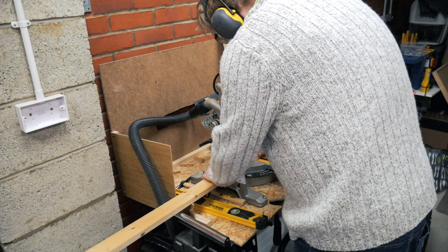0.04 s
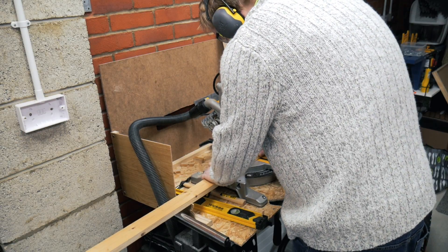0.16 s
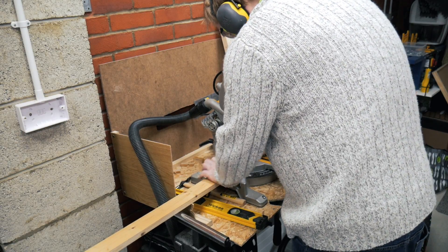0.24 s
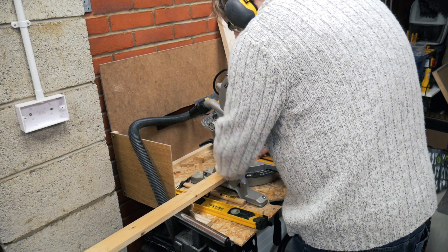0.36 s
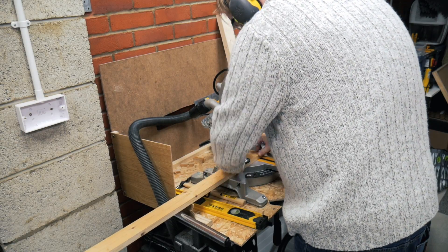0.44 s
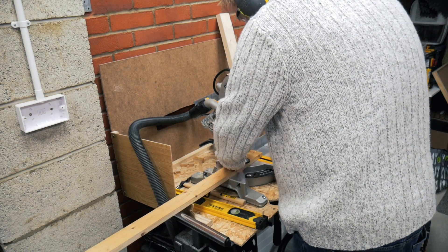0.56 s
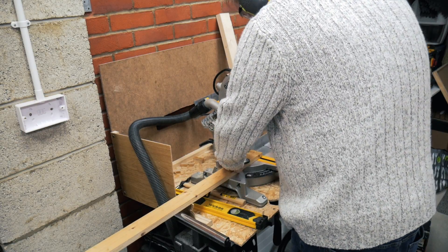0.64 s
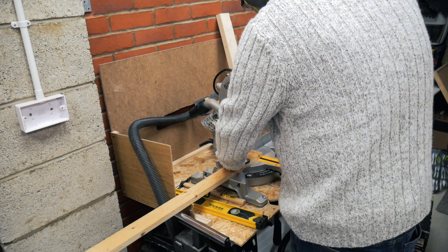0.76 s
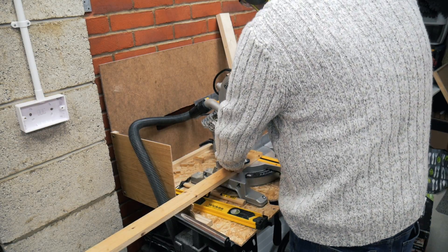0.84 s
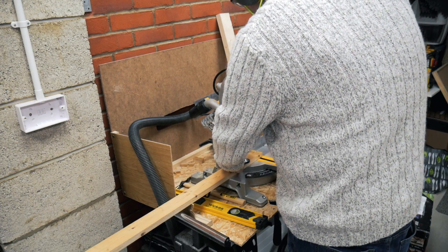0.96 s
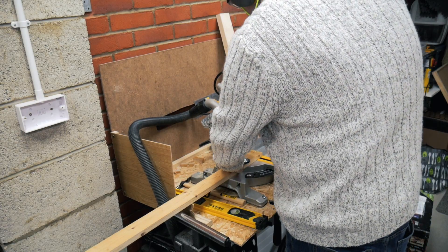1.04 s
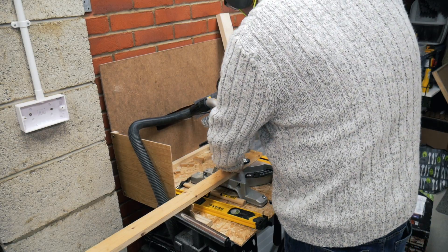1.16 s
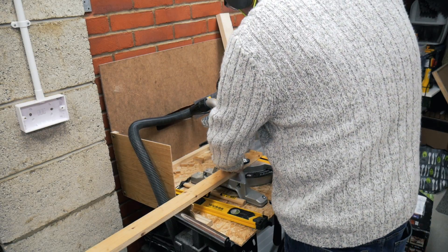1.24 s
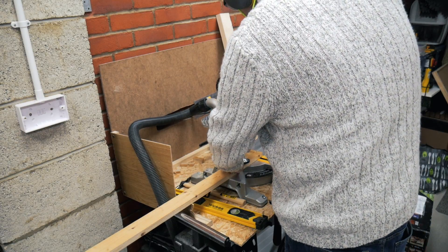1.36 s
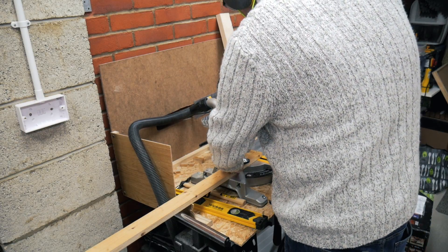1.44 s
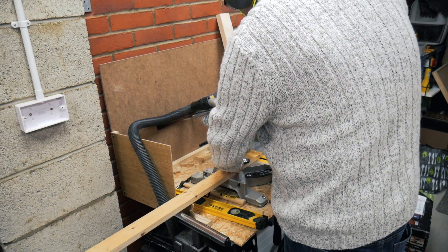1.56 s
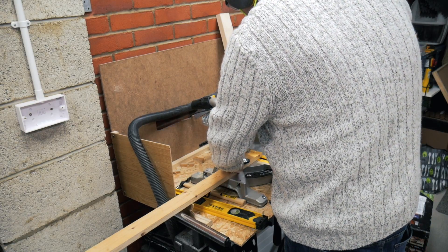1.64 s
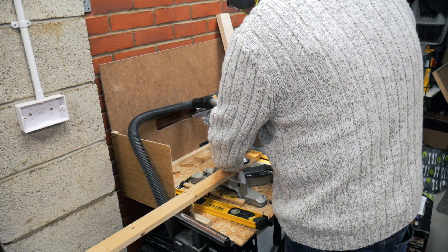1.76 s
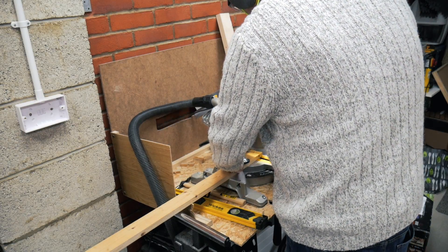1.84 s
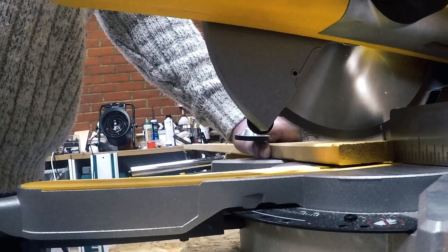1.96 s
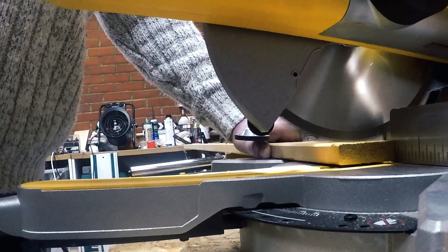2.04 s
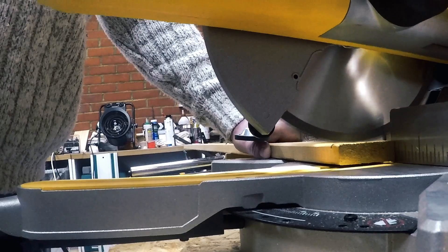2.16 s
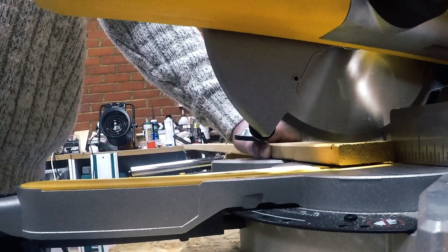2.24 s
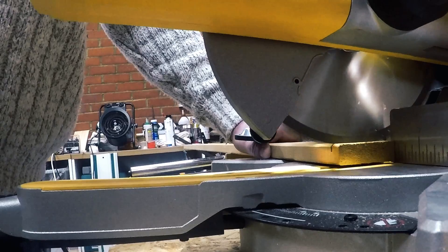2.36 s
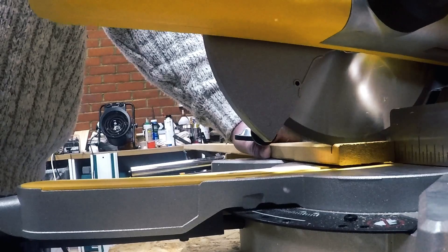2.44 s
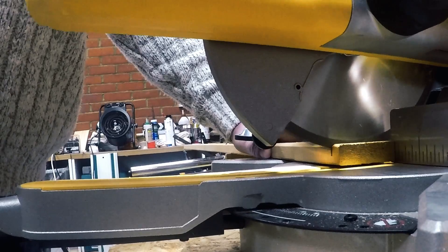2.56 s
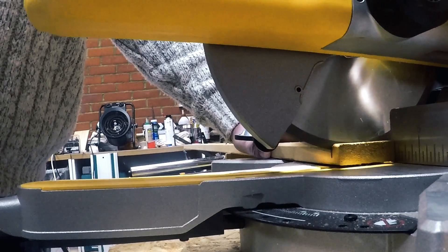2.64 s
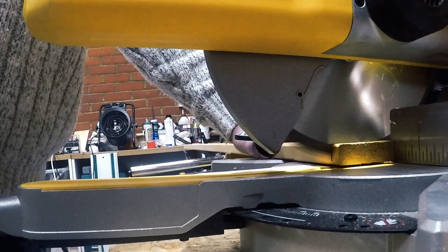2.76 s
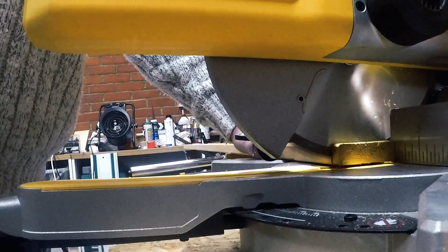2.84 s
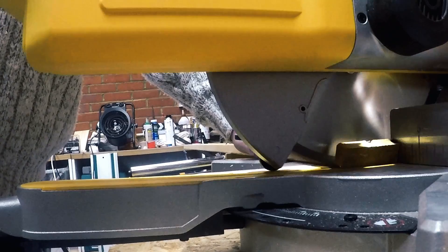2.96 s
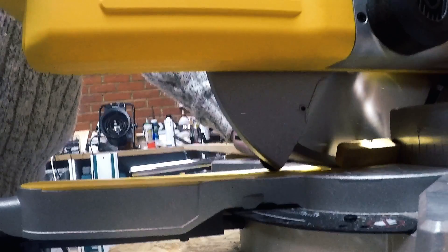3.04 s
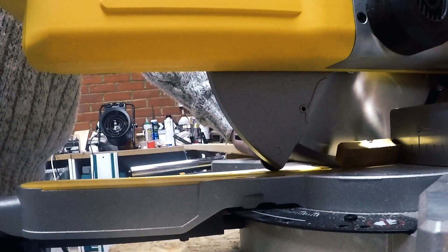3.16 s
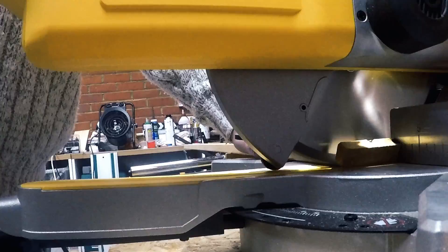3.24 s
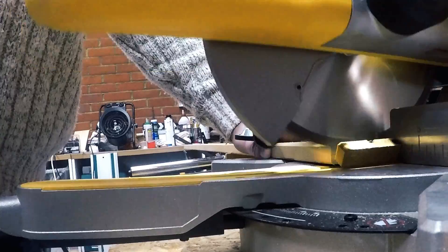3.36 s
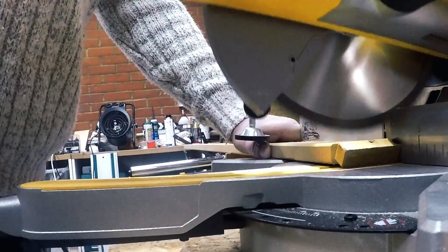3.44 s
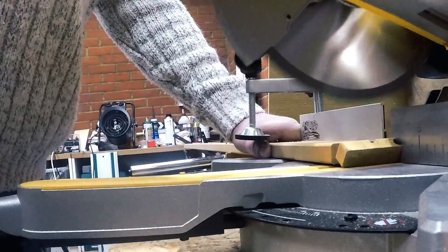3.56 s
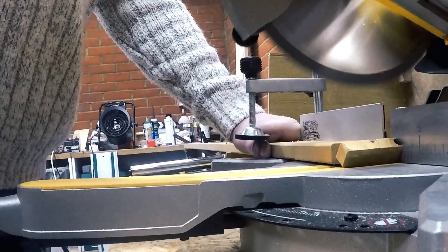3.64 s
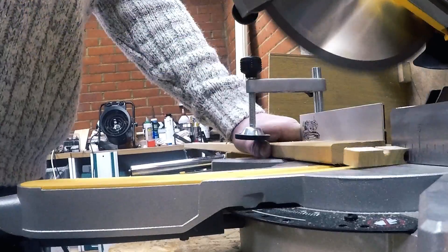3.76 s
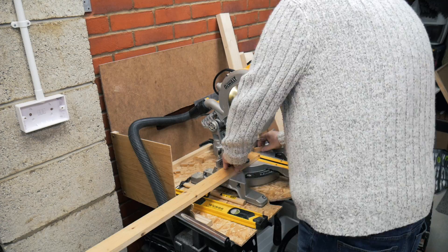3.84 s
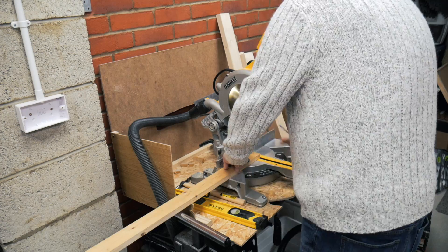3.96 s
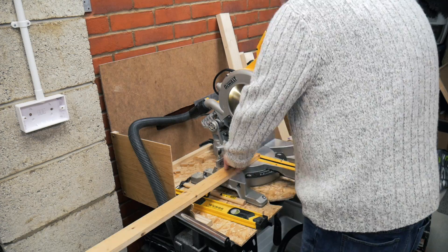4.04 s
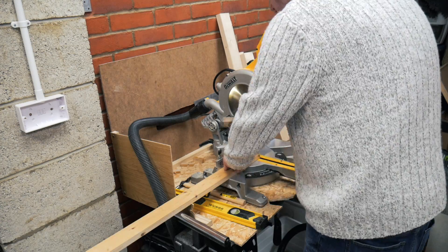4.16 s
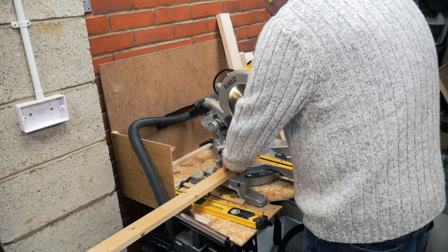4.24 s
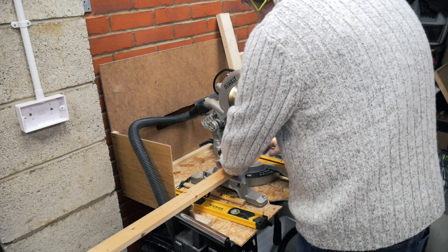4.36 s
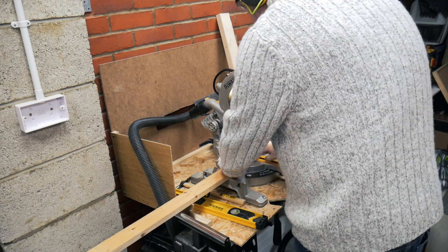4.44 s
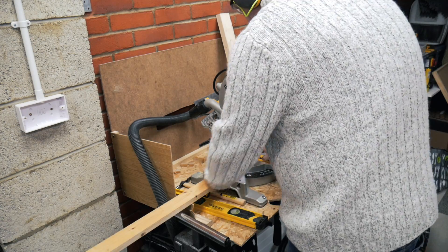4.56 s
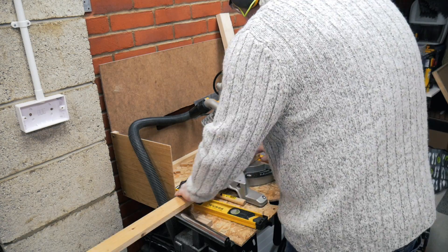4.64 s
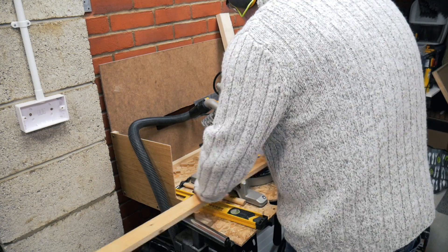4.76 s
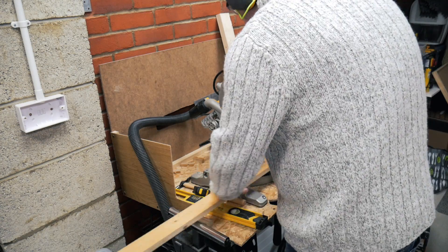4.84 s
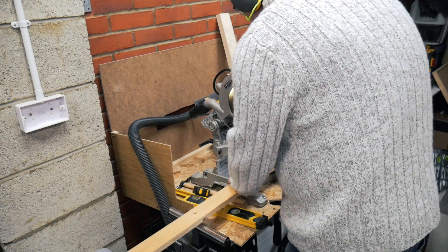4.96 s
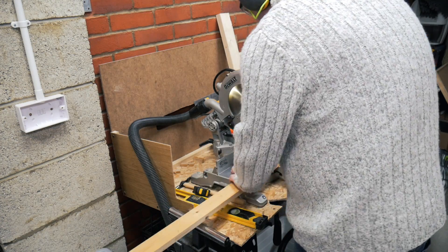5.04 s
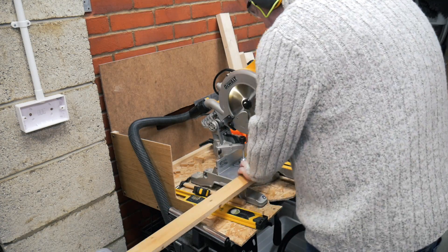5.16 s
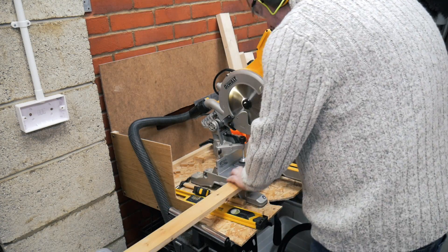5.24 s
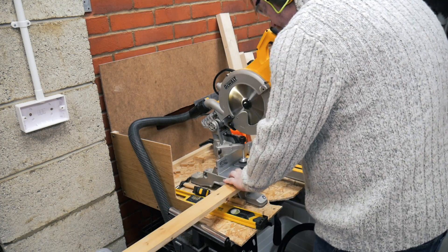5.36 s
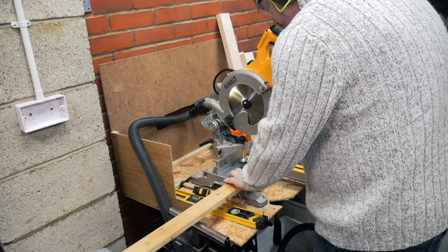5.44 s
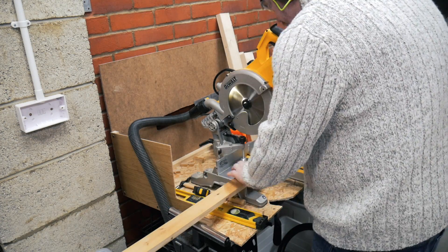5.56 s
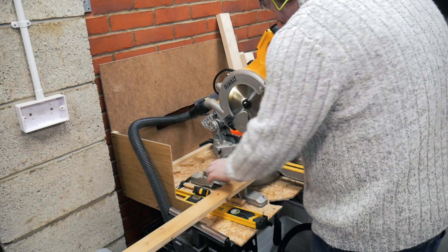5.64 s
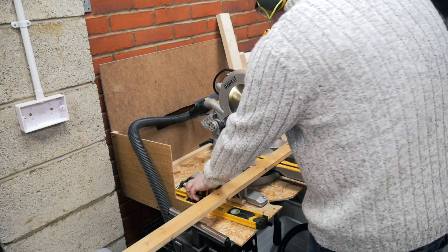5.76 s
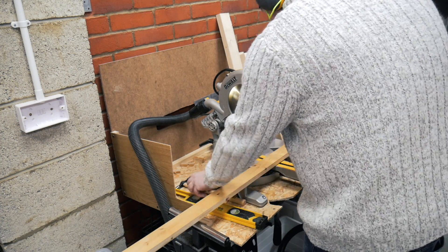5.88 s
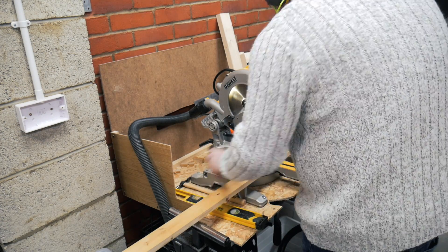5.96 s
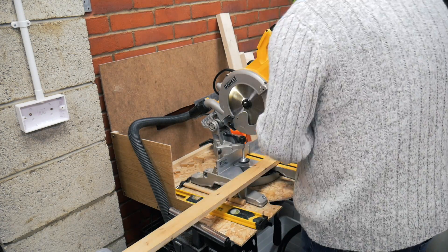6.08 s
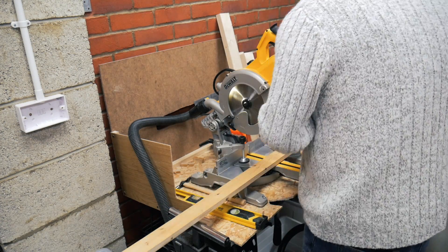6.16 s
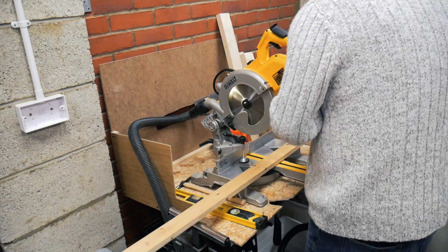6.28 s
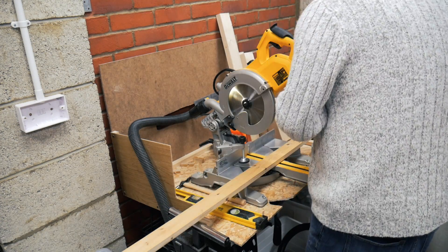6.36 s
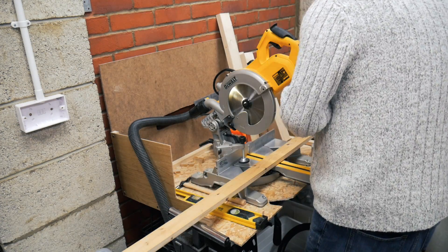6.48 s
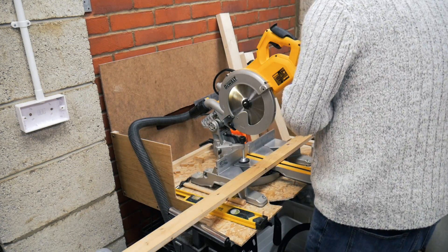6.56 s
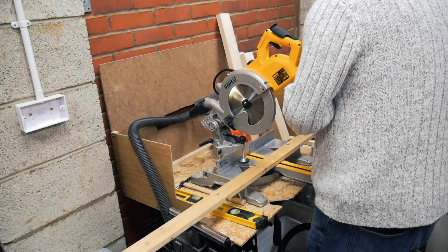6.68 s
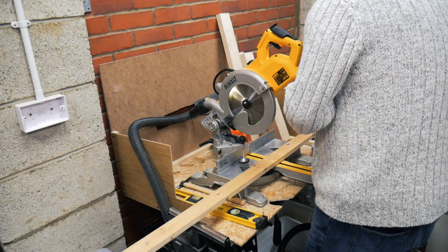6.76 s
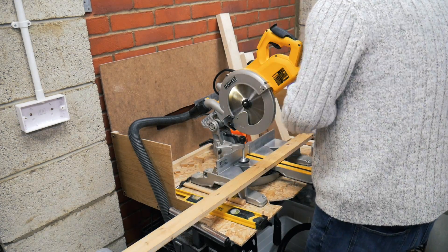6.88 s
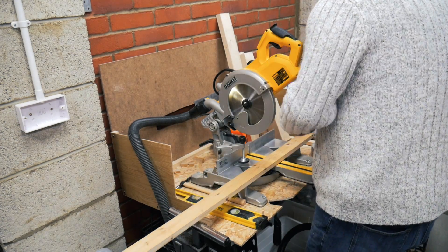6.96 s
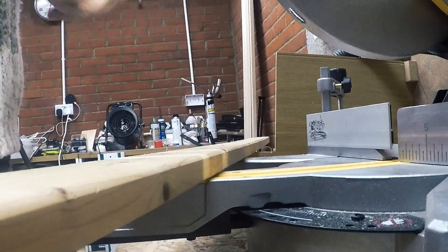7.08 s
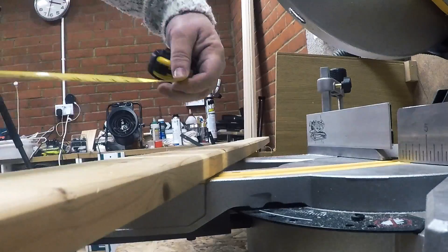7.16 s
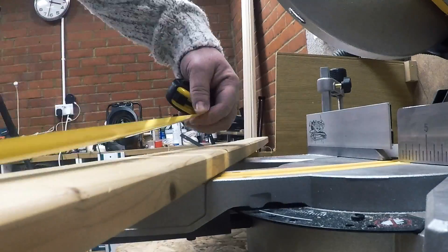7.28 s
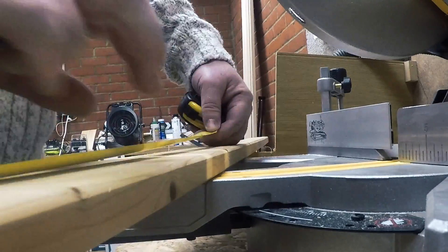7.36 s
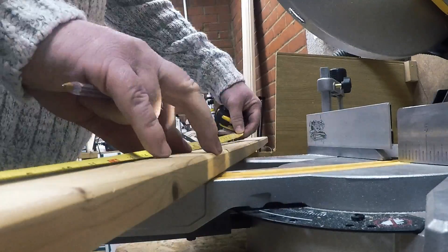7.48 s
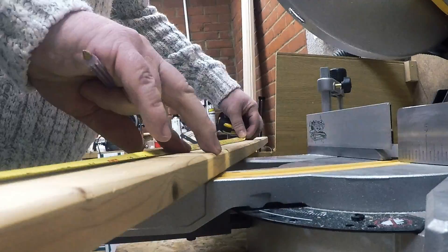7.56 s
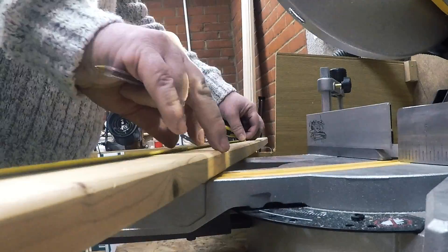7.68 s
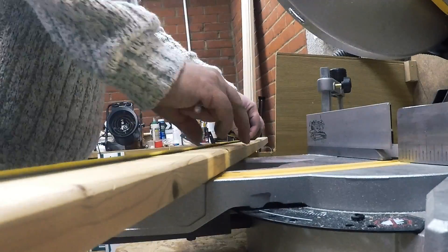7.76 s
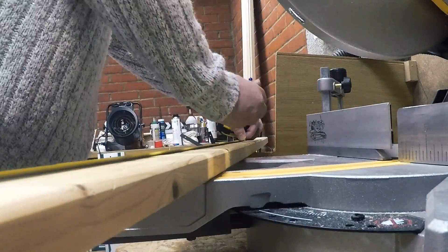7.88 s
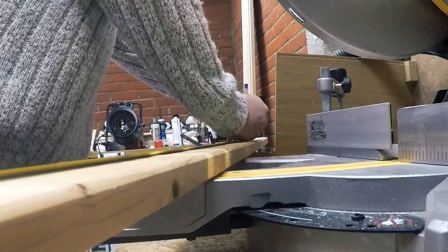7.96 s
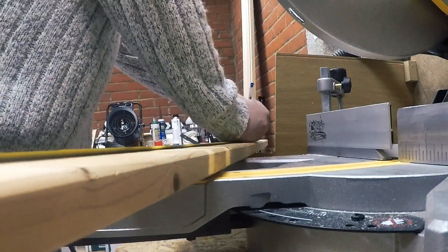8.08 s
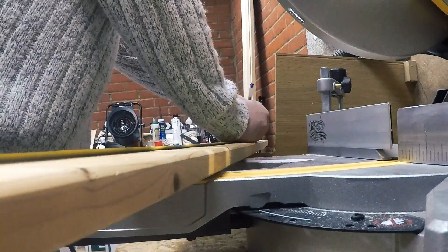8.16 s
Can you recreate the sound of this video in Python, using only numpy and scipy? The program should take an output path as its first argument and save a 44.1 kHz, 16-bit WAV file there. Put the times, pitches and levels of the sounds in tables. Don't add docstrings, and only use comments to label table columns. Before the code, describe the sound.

In a small brick workshop, wood knocks, sleeves rustle and small parts click. A sharp trigger snap starts a geared electric mitre saw, which whines up quickly, cuts a slat with a brighter, strained rasp, then is released and coasts down over more than two seconds amid wooden knocks. Handling follows; then, with the microphone on the bench, a steel tape ticks and hands thump the board.

```python
import sys
import numpy as np
from scipy import signal
from scipy.fft import rfft, irfft, next_fast_len
from scipy.io import wavfile
from scipy.ndimage import uniform_filter1d

SR = 44100
rng = np.random.default_rng(int(sys.argv[2]) if len(sys.argv) > 2 else 0)


def materialize(psi):
    bounded = np.clip(np.atleast_2d(psi).T, -1, 1)
    quanta = np.round(bounded * 32767).astype(np.int16)
    wavfile.write(sys.argv[1], SR, quanta)


def gain_from_decibels(decibels):
    exponent = np.asarray(decibels, float) / 20
    return 10 ** exponent


N = 362502
TIME = np.arange(N) / SR
SIZE = next_fast_len(N)
HZ = np.maximum(np.arange(SIZE // 2 + 1) * SR / SIZE, 1)
TRIGGER_S, BITE_S, RELEASE_S, REST_S = 1.28, 1.33, 3.23, 5.72
MOVE_S = 7.085


def unit(x):
    return x / np.sqrt(np.mean(x ** 2))


def to_peak(x, db):
    return x * gain_from_decibels(db) / np.abs(x).max()


def die_away(t, decay):
    return gain_from_decibels(-60 * t / decay)


def sounding(t0, t1, fade=0.0012):
    return np.clip(np.minimum(TIME - t0, t1 - TIME) / fade, 0, 1)


def tone(points, modes=()):
    hz, level_db = np.transpose(points)
    db = np.interp(np.log(HZ), np.log(hz), level_db)
    for centre, width, gain_db in modes:
        db = db + gain_db / (1 + (2 * (HZ - centre) / width) ** 2)
    return gain_from_decibels(db)


def band(lo_hz, hi_hz):
    return np.sqrt(1 / (1 + (HZ / hi_hz) ** 12) - 1 / (1 + (HZ / lo_hz) ** 12))


def shape(x, gain):
    return irfft(rfft(x, SIZE) * gain, SIZE)[..., :N]


def walk(rate):
    k = int(SR / rate)
    steps = np.repeat(rng.standard_normal(N // k + 1), k)
    return 1.52 * uniform_filter1d(uniform_filter1d(steps, k), k)[:N]


def grit(rate, spread_db):
    return rng.standard_normal(N) * gain_from_decibels(spread_db * walk(rate))


def ring(x, hz, width):
    return signal.lfilter(*signal.iirpeak(hz, hz / width, fs=SR), x)


def add(out, s, burst):
    i, end = int(s * SR), int(MOVE_S * SR) if s < MOVE_S else N
    out[i:min(i + len(burst), end)] += burst[:end - i]


# [f/Hz, level/dB per Hz]
STANDING_AIR = [(15, -64), (25, -27), (93, -13.5), (186, -9.5), (237, -0.5), (373, -9), (462, -11.5),
                (588, -11.5), (709, -15.5), (1580, -21), (2070, -26), (4620, -36.5), (15000, -41.5)]
# [f/Hz, level/dB per Hz]
BENCH_AIR = [(82, -24), (140, -6), (294, -5.5), (338, -8), (540, -22.5), (683, -18), (830, -25),
             (1200, -23), (2430, -35), (7710, -40.5), (15000, -47)]
# [f/Hz, width/Hz, gain/dB]
DRONES = [(234, 9.9, 2.5), (450, 25, 10), (695, 7.8, 11), (910, 20, 5.5)]


def shop_air():
    near = np.clip((TIME - MOVE_S) / 0.0086, 0, 1)
    stand = np.array([unit(shape(grit(15.0, 0.32), tone(STANDING_AIR, DRONES))) for _ in range(2)])
    bench = np.array([unit(shape(grit(5.1, 0.99), tone(BENCH_AIR, [(700, 9, 15)]))) for _ in range(2)])
    stand_db = -62 - 5.5 * sounding(TRIGGER_S, 4.97, 0.296)
    mix = stand * gain_from_decibels(stand_db) * (1 - near) + bench * gain_from_decibels(-61) * near
    return mix * gain_from_decibels([[0], [-3.0]])


# [t/s, level/dB, hold/s]
THUMPS = [
    (7.488, -57, .02),
    (7.554, -59, 0.15),
    (7.724, -62.5, 0.12),
    (8.095, -66, .005),
    (8.16, -73, .005),
]


def thumps():
    low = tone([(15, -12), (35, 5), (70, 5), (160, -5), (300, -51)])
    one, two = [unit(shape(grit(27, 2.9), low)) for _ in range(2)]
    levels = []
    for s, db, hold in THUMPS:
        rise_db = 1500 * np.maximum(s - TIME, 0)
        fall_db = 138 * np.maximum(TIME - s - hold, 0)
        levels.append(db - rise_db - fall_db)
    return np.array([0.9 * one + 0.5 * two, 1.6 * two]) * gain_from_decibels(np.max(levels, axis=0))


# [from t/s, to t/s, level/dB]
RUBBING = [
    (-.1, 0.236, -68.5),
    (0.166, 1.338, -73.5),
    (5.498, 7.205, -73.5),
    (7.203, 7.69, -77),
]
# [f/Hz, level/dB per Hz]
RUBBING_COLOUR = [(530, -39), (900, -2), (1260, 3.5), (1410, -6.5), (1810, 0.5), (2110, -5), (5160, -4),
                  (9470, -22.5), (14000, -38)]


def rustle():
    level = sum(gain_from_decibels(db) * sounding(t0, t1, 0.069) for t0, t1, db in RUBBING)
    return unit(shape(grit(280, 1.48), tone(RUBBING_COLOUR, [(5130, 700, 4)]))) * level


# [t/s, peak level/dB, f/Hz, decay/s]
WEIGHT = [
    (0.11, -57, 99, 0.33),
    (0.169, -54, 117, 0.16),
    (5.189, -65, 108, 0.26),
    (5.4, -52, 126, 0.11),
    (5.813, -62, 102.3, 0.28),
    (7.803, -43, 177, .08),
    (8.07, -48, 190, 0.13),
    (8.11, -46.5, 170, 0.11),
]


def thuds():
    out, t = np.zeros(N), TIME[:SR // 2]
    for s, db, hz, decay in WEIGHT:
        swing = np.sin(2 * np.pi * hz * t) * np.minimum(t / 0.0069, 1)
        add(out, s, gain_from_decibels(db) * die_away(t, decay) * swing)
    return out


# [t/s, peak level/dB, ring f/Hz, decay/s, second ring f/Hz]
WOOD_KNOCKS = [(0.103, -38, 510, 0.1, 526), (0.129, -42, 207, 0.25, 487), (0.351, -45.5, 357, 0.11, 810),
               (.116, -41.5, 328, 0.085, 696), (0.664, -49, 252, 0.091, 450),
               (0.856, -41.5, 370, 0.057, 465), (0.898, -50, 695, .04, 450), (0.921, -46, 416, 0.14, 700),
               (1.301, -40.5, 208, 0.19, 815), (3.532, -32.5, 650, 0.11, 679),
               (4.352, -30, 590, 0.06, 1100), (4.346, -36, 323, 0.051, 700), (4.368, -38, 330, 0.041, 1490),
               (4.49, -41, 686, 0.068, 504), (4.569, -41, 721, 0.06, 380), (5.172, -49, 1050, 0.13, 1900),
               (5.198, -48, 200, 0.068, 651), (5.272, -44, 250, 0.11, 320), (5.286, -46, 950, 0.11, 1400),
               (5.285, -39, 199, .09, 330), (5.31, -50, 200, .1, 520), (5.381, -46, 230, 0.11, 615),
               (5.819, -54, 258, 0.4, 560), (5.871, -51, 600, .05, 890), (5.91, -49, 350, 0.12, 450),
               (5.947, -43.5, 600, 0.03, 540), (5.956, -46, 333, 0.073, 500), (5.93, -51.5, 192, 0.11, 300),
               (7.471, -47, 89, 0.06, 457), (7.804, -50.5, 173, 0.034, 300), (8.087, -64, 179, 0.13, 655)]


def knocks():
    out, t = np.zeros(N), TIME[:SR // 4]
    for s, db, hz, decay, upper_hz in WOOD_KNOCKS:
        push = rng.standard_normal(len(t)) * die_away(t, decay) * np.minimum(t / 0.0026, 1)
        lower = unit(ring(ring(push, hz, hz / 3), hz, hz))
        upper = unit(ring(ring(push, upper_hz, upper_hz / 4), upper_hz, upper_hz))
        add(out, s, to_peak(lower + 0.5 * upper, db))
    return out


# [t/s, length/s, level/dB, centre f/Hz, width/Hz]
SLIDES = [(.01, 0.058, -65.5, 4960, 6000), (0.136, 0.045, -52.5, 4800, 4000),
          (0.272, 0.083, -60, 4700, 6100), (0.396, 0.12, -68, 4940, 6000),
          (0.523, 0.043, -64.5, 5200, 3000), (0.918, 0.049, -51, 4600, 3970),
          (0.989, 0.09, -65.5, 1530, 1510), (5.867, 0.029, -54, 3520, 3500),
          (6.156, 0.024, -63, 4170, 3000), (6.879, 0.14, -65, 5840, 6000), (7.215, 0.03, -60.5, 4000, 3000),
          (7.506, 0.11, -64, 6600, 1800), (7.326, 0.057, -65.5, 5000, 6000),
          (7.487, 0.097, -62.5, 4050, 4000)]
# [t/s, length/s, level/dB, centre f/Hz, width/Hz]
SUDDEN_RATTLES = [(7.017, 0.047, -59.5, 4200, 3400), (1.01, 0.028, -57, 4600, 600),
                  (1.054, 0.031, -62, 3350, 700), (1.132, .03, -61, 4300, 1700),
                  (0.43, 0.028, -60.5, 3700, 900), (.143, .03, -56, 5400, 900),
                  (0.45, .035, -67, 5300, 600), (6.928, .04, -59, 5900, 3000),
                  (7.0451, 0.043, -43, 6300, 4100), (7.0457, 0.027, -46, 10500, 3000),
                  (7.096, .016, -61, 5500, 5000), (7.109, 0.02, -55.5, 6000, 4800),
                  (7.146, 0.098, -57.5, 6100, 3300), (7.459, .016, -63, 5500, 4000),
                  (6.144, .03, -67, 3900, 3000)]


def scrapes():
    out = np.zeros(N)
    rows = [(*row, 0.72) for row in SLIDES] + [(*row, 0.36) for row in SUDDEN_RATTLES]
    for s, length, db, hz, width, lean in rows:
        u = np.linspace(0, 1, int(length * SR))
        flicker = np.repeat(rng.standard_normal(len(u) // 60 + 1), 60)[:len(u)]
        grains = rng.standard_normal(len(u)) * gain_from_decibels(2.3 * flicker)
        rub = unit(ring(ring(grains, hz, width), hz, 2 * width))
        add(out, s, gain_from_decibels(db) * np.sin(np.pi * u ** lean) * rub)
    colour = [(1000, 8.5), (7000, -5.0), (8200, -9.0), (10500, -5.5), (13000, -14)]
    return shape(out, tone(colour, [(5200, 720, 4)]))


# [t/s, peak level/dB, ring f/Hz, woodiness/dB]
CONTACTS = [(0.1052, -50, 5100, 12), (0.354, -45.5, 2500, -9), (0.4646, -52, 3900, -9),
            (0.8599, -48.5, 4790, -17), (0.9, -58, 1500, 2), (0.9257, -31.5, 4770, -40),
            (1.1342, -48, 4970, -7), (4.563, -46, 4200, -13), (5.827, -53, 3300, -8),
            (5.8717, -37.5, 4800, -7.5), (5.9473, -46.5, 3650, -8.5), (6.1457, -50, 3520, -14),
            (6.8967, -58, 5000, -19), (7.4715, -39.5, 5400, -12.5)]
# [t/s, peak level/dB, ring f/Hz, woodiness/dB, brightness/dB]
SNAPS = [
    (1.274, -17.5, 2920, -13, -29),
    (7.0457, -36, 3600, -14, -5),
]


def clicks():
    out, t = np.zeros(N), TIME[:SR // 5]
    # brightness in dB for the contacts, decay in s for both
    rows = [(*row, -56, 0.15) for row in CONTACTS] + [(*row, 0.03) for row in SNAPS]
    for s, db, hz, wood_db, bright_db, decay in rows:
        decay *= 1 if s < MOVE_S else .25
        fade = die_away(t, decay) + 1.5 * die_away(t, .012)
        crack = rng.standard_normal(len(t)) * fade * np.minimum(t / .0005, 1)
        metal = unit(ring(ring(ring(crack, 4200, 4000), 4200, 4000), 4200, 6000))
        part = unit(ring(crack, hz, hz / 12))
        bright = unit(ring(ring(crack, 10000, 3800), 10000, 3800))
        wood = unit(ring(crack, 1485, 230) + ring(crack, 1840, 230))
        burst = metal + 1.5 * part + gain_from_decibels(bright_db + 10) * bright + gain_from_decibels(wood_db + 15.0) * wood
        add(out, s, to_peak(burst, db))
    return shape(out, band(1000, 14500))


# [t/s, peak level/dB, ring f/Hz, second ring f/Hz, decay/s]
TAPE_TICKS = [(7.093, -52, 5800, 3500, .012), (7.111, -51, 6800, 4500, .015),
              (7.1484, -38.5, 6460, 3700, .012), (7.167, -37.5, 6300, 3780, .012),
              (7.1955, -47, 5700, 3000, .012), (7.2112, -46, 3000, 5000, .01),
              (7.2157, -34.5, 6150, 3200, 0.022), (7.2238, -38.5, 3300, 5200, 0.035),
              (7.3416, -54, 4100, 9000, .015), (7.471, -38, 3300, 5500, .02),
              (7.387, -50, 6800, 4500, 0.033), (7.5122, -55, 3940, 6500, .015),
              (7.587, -51, 3100, 6300, .03)]


def tape():
    out, t = np.zeros(N), TIME[:SR // 16]
    for s, db, hz, second_hz, decay in TAPE_TICKS:
        tick = rng.standard_normal(len(t)) * die_away(t, 0.0049)
        tail = tick + 0.63 * rng.standard_normal(len(t)) * die_away(t, decay)
        first = unit(ring(tail, hz, hz / 9))
        second = unit(ring(tail, second_hz, second_hz / 9))
        add(out, s, to_peak(unit(ring(tick, 4700, 7000)) + 1.8 * first + 1.2 * second, db))
    return shape(out, band(1900, 7000))


# [t/s, length/s,
# f/Hz, end f/Hz, level/dB]
NOTES = [(2.1, .25, 2745, 2740, -49.5), (2.35, .2, 5330, 5310, -40), (2.44, .1, 4980, 4950, -44),
         (2.63, .13, 3890, 3890, -46), (3.09, .16, 3880, 3880, -45), (2.45, .33, 992, 960, -52),
         (3.11, .11, 5330, 5310, -40), (3.13, .05, 5650, 5650, -42), (2.81, .08, 4950, 4850, -43),
         (2.82, .07, 5550, 5500, -43), (2.68, .3, 955, 985, -52), (2.9, .12, 985, 1060, -57),
         (2.53, .14, 1310, 1295, -55), (2.68, .12, 1320, 1295, -55), (1.4, .075, 250, 280, -44),
         (4.78, .2, 2650, 2750, -62), (1.318, .06, 2450, 3100, -38), (1.345, .07, 2900, 3900, -40),
         (1.39, .08, 3750, 4800, -41), (4.65, .5, 1590, 1570, -60), (2.68, .16, 6390, 6385, -46),
         (7.336, .028, 1400, 1400, -58), (7.332, .03, 2080, 2060, -58), (5.26, .045, 2050, 2250, -52),
         (5.15, .07, 1900, 1850, -58), (4.25, .07, 6780, 6750, -57)]
# [t/s, length/s, f/Hz, end f/Hz, level/dB]
BREATHY_NOTES = [(1.33, .1, 2650, 4150, -41), (1.395, .06, 4900, 4950, -38), (1.66, .04, 4800, 4800, -39),
                 (5.545, .06, 5400, 5250, -60), (5.58, .07, 5300, 5200, -66), (5.25, .32, 5200, 5200, -67),
                 (6.015, .1, 2650, 2950, -69), (1.272, .045, 2800, 2650, -40),
                 (1.272, .05, 3250, 3300, -41), (1.295, .035, 1600, 1900, -40), (4.9, .3, 2300, 1600, -62),
                 (5.05, .3, 3300, 2900, -63)]


def squeaks():
    out, waver, flutter = np.zeros(N), walk(300), walk(60)
    rows = [(*row, 10000) for row in NOTES] + [(*row, 2200) for row in BREATHY_NOTES]
    for s, length, hz, end_hz, db, calm_hz in rows:
        count, i = int(length * SR), int(s * SR)
        glide = 2 * np.pi * np.cumsum(np.linspace(hz, end_hz, count)) / SR
        glide = glide + hz / calm_hz * waver[i:i + count]
        add(out, s, gain_from_decibels(db + 2 * flutter[i:i + count]) * np.hanning(count) * np.sin(glide))
    return out


FULL_SPEED = 362.5
# [share of the speed still missing, time constant/s]
RUN_UP_STAGES = [(.66, .094), (.34, .245)]
# [t/s, speed/turns per s]
COASTING = [(3.0, 415), (3.6, 277), (3.8, 234), (4.0, 196), (4.1, 179), (4.5, 127.5), (4.8, 87.3),
            (5.2, 43), (5.6, 8)]


def rotor():
    since_s = np.maximum(TIME - TRIGGER_S, 0)
    inrush = sum(share * np.exp(-since_s / tau) for share, tau in RUN_UP_STAGES)
    cut = np.exp(-((TIME - 2.75) / .27) ** 2)
    driven = FULL_SPEED * (1 - inrush) - 23 * cut
    coast = np.interp(TIME, *np.transpose(COASTING))
    return uniform_filter1d(np.minimum(driven, coast), size=1500), inrush, cut


# [from t/s, to t/s, f/Hz, width/Hz, level/dB at full speed]
GUARD_RINGS = [(1.2, 2.33, 4610, 860, -43), (1.6, 3.1, 5300, 770, -49), (3.9, 5.3, 750, 110, -46),
               (3.42, 4.1, 4770, 390, -45), (2.36, 2.58, 5330, 270, -48), (2.62, 2.72, 5300, 570, -47),
               (2.81, 2.93, 5250, 660, -47.5), (3.11, 3.2, 5450, 450, -43), (3.25, 3.5, 3700, 700, -50),
               (3.23, 4.34, 4560, 860, -45.5), (4.25, 5.7, 5050, 270, -65)]


def guard():
    speed = np.maximum(rotor()[0], 1)
    wind = grit(18, 1) * (speed / FULL_SPEED) ** 1.7
    out = 0
    for t0, t1, hz, width, db in GUARD_RINGS:
        hollow = ring(ring(wind, hz, width), hz, width) * np.sqrt(SR / width)
        out = out + gain_from_decibels(db) * sounding(t0, t1, min(0.15, (t1 - t0) / 4)) * hollow
    return out


# [f/Hz, level/dB per Hz]
SAW_COLOUR = [(35, -65), (60, -54.5), (117, -28.5), (234, -10.5), (458, -5.5), (491, -7), (539, -3.5),
              (695, -1.5), (916, -9), (1830, -6.5), (2060, -6.5), (5180, -2.5), (7860, -19.5), (9900, -21),
              (15000, -40.5)]
# [f/Hz, width/Hz, gain/dB]
SAW_BODY = [(498, 18, 8), (705, 40, 2), (790, 45, 5), (970, 25, 5), (1300, 30, 2), (1580, 35, 6),
            (1850, 60, 4), (2455, 45, 3), (2742, 25, 4), (3075, 120, 4), (3888, 40, 3), (4500, 70, 3),
            (4970, 45, 3), (5250, 300, 2), (6385, 20, 5), (6600, 30, 4), (9000, 150, 3)]
# level at full speed/dB, power of speed, bearing drag level/dB,
# starting current level/dB, change in the cut/dB
AIR_LAW, RUMBLE_LAW = (-38.5, 2, -51.5, -31, 1), (-58, -0.82, -53, -39, -5)
GEARS_LAW, SPARKS_LAW = (-46.5, 1, -56, -36, -0.5), (-45.5, 2.5, -64, -46, 3.5)
# [t/s, level/dB, half length/s]
BUMPS = [
    (3.09, -53.5, 0.016),
    (4.374, -45, 0.0096),
    (4.57, -50, 0.0043),
    (5.184, -66, 0.027),
    (5.298, -65, 0.039),
    (5.397, -84, .02),
]
# share of a bump/dB, level of the first jerk/dB
BUMP_DB, JERK_DB = (-6, -10, 1.5, -36), (-34.5, -38.5, -35, -67)
# speed below which each dies away/turns per s, share heard before the gears take up
STALL_SPEED, EARLY_SHARE = (7.5, 109, 15, 12), (0.21, 1, 0.43, 0.11)


def saw_noise():
    speed, inrush, cut = rotor()
    share = np.maximum(speed, 1) / FULL_SPEED
    driven = gain_from_decibels(1.5 * sounding(0, RELEASE_S, .06))
    geared = sounding(BITE_S - .01, 9, .02)
    jerk = np.exp(-np.abs(TIME - TRIGGER_S) / 0.0061)
    bumps = sum(gain_from_decibels(db) * np.exp(-((TIME - s) / half) ** 2) for s, db, half in BUMPS)
    colour = tone(SAW_COLOUR, SAW_BODY)
    air = unit(shape(grit(500, 1.0), colour * band(3260, 9900)))
    rumble = unit(shape(grit(40, 0.45), colour * band(130, 1200)))
    gears = unit(shape(grit(150, 0.39), colour * band(1015, 3190)))
    sparks = unit(shape(grit(600, 1.1), colour * band(6900, 23950)))
    layers = (air, rumble, gears, sparks)
    mix = 0
    for k, law in enumerate((AIR_LAW, RUMBLE_LAW, GEARS_LAW, SPARKS_LAW)):
        full_db, power, drag_db, start_db, cut_db = law
        run = gain_from_decibels(full_db + cut_db * cut) * share ** power * driven
        run = run + gain_from_decibels(drag_db) * share ** 0.55
        run = run + gain_from_decibels(start_db) * inrush
        run = run * np.tanh(speed / STALL_SPEED[k]) ** 2 * np.maximum(geared, EARLY_SHARE[k])
        mix = mix + layers[k] * (run + gain_from_decibels(JERK_DB[k]) * jerk + gain_from_decibels(BUMP_DB[k]) * bumps)
    lull_db = -1.2 * np.exp(-((TIME - 3.02) / 0.084) ** 2)
    mix = mix * gain_from_decibels(0.35 * walk(12) + lull_db)
    return mix * sounding(TRIGGER_S, 9) * np.clip((REST_S - TIME) / 0.14, 0, 1)


BRUSH_BARS, FAN_BLADES, MAINS_HZ = 20, 30, 50
BENCH_HZ, BENCH_WIDTH = 258, 68
# [speed/turns per s, level/dB]
WHINE_LAW, TICKS_LAW = [(8, -95), (48, -77), (172, -70), (234, -59), (288, -52), (322, -50), (362, -48.5)], [(8, -95), (48, -70), (70, -66.5), (90, -65), (125, -63), (165, -63),
                                       (200, -68), (270, -66)]
FAN_LAW, SHAKE_LAW = [(8, -95), (40, -72), (62, -70), (78, -63), (88, -56), (112, -57), (122, -64),
                      (270, -61), (330, -64)], [(8, -95), (100, -80), (172, -74), (196, -62), (225, -66), (262, -55),
                                   (285, -66), (305, -72), (360, -66)]
# [multiple of twice the mains f, level/dB]
HUM_TONES = [(1, -57), (5, -61), (6, -64), (7, -63)]


def motor_tones():
    speed, inrush, cut = rotor()

    def at_speed(law):
        return gain_from_decibels(np.interp(speed, *np.transpose(law)))

    geared = inrush * sounding(BITE_S, 9, .03)
    turn = 2 * np.pi * np.cumsum(speed) / SR
    shake = gain_from_decibels(walk(25.18)) * np.sin(turn) * at_speed(SHAKE_LAW)
    shake = shake / np.sqrt(0.057 + ((speed - BENCH_HZ) / BENCH_WIDTH) ** 2)

    bars = BRUSH_BARS * turn + .2 * walk(120)
    whine = np.sin(bars + .8 * walk(200)) * gain_from_decibels(2.8 * walk(50))
    start_whine = gain_from_decibels(-43) * inrush ** 1.3 * np.clip(speed / 40 - 1.4, 0, 1)
    whine = whine * (at_speed(WHINE_LAW) * gain_from_decibels(-3 * cut) + start_whine)

    waver, flutter = .6 * walk(200), 5 * walk(35)
    ticks = 0
    for k in range(2, 10):
        overtone = np.sin(k * bars + np.roll(waver, 9000 * k)) * gain_from_decibels(np.roll(flutter, 9000 * k))
        ticks = ticks + overtone * (k * BRUSH_BARS * speed < 13000)
    ticks = ticks * (at_speed(TICKS_LAW) + gain_from_decibels(-51) * geared)
    ticks = shape(ticks, tone([(2000, -14), (4500, -3), (5600, 1), (6800, 0), (7400, -8),
                               (8200, -9), (9500, -8), (11500, -22)]))

    fan = np.sin(FAN_BLADES * turn + 1.2 * walk(170)) * gain_from_decibels(2 * walk(35))
    fan = fan * (at_speed(FAN_LAW) + gain_from_decibels(-46) * geared)

    current = (gain_from_decibels(5) * inrush + gain_from_decibels(-26)) * sounding(TRIGGER_S, RELEASE_S, .03)
    hum = 0
    for k, db in HUM_TONES:
        hum = hum + np.sin(4 * np.pi * MAINS_HZ * k * TIME) * gain_from_decibels(db + 2 * walk(12))
    growl = unit(shape(rng.standard_normal(N), band(99, 244))) * gain_from_decibels(-67.5)
    growl = growl * sounding(TRIGGER_S, 3.81, 0.053)
    return (shake + whine + ticks + fan + hum * current + growl) * sounding(TRIGGER_S, REST_S, .025)


def room(x):
    t, parts = TIME[:SR // 3], []
    for part, t60_s, db in zip(np.split(x, [int(MOVE_S * SR)]), (0.14, 0.15), (-11, -18)):
        tails = rng.standard_normal((2, len(t))) * die_away(t, t60_s) * (t > .002)
        tails *= gain_from_decibels([[db], [0]]) / np.sqrt((tails ** 2).sum(axis=1, keepdims=True))
        parts.append(signal.fftconvolve(part[None], tails, axes=1)[:, :len(part)])
    return np.hstack(parts)


def lean_db():
    shop_db, saw_db, bench_db = -1.5, -0.4, -5
    saw, bench = sounding(TRIGGER_S, REST_S, 0.97), sounding(7.1, 99, .3)
    return shop_db + (saw_db - shop_db) * saw + (bench_db - shop_db) * bench


# [f/Hz, level/dB]
ECHO_WIDTH = [(60, -6), (130, -10.5), (250, -17.5), (700, -8), (1300, -8), (2400, -8), (3300, -15.5),
              (4600, -30), (6200, -17.5), (7600, -2), (11000, -8.5), (15000, -2)]


def scene():
    hands = rustle() + thuds() + knocks() + scrapes() + clicks() + tape() + squeaks()
    dry = hands + guard() + saw_noise() + motor_tones()
    wet, air = room(dry), shop_air()
    mid = dry + wet[0] + air[0]
    side = shape(wet[1], tone(ECHO_WIDTH)) + air[1]
    lean = shape(mid, band(12, 1033)) * np.tanh(lean_db() * np.log(10) / 40)
    lean = lean + .05 * shape(mid, band(7580, 16000))
    return np.array([mid + side + lean, mid - side - lean]) + thumps()


# [f/Hz, level/dB]
DULL_TOP = [(11200, 0), (12200, -2), (15050, 0), (15250, -50)]


def band_limit(x):
    return signal.sosfilt(signal.butter(12, 16040, fs=SR, output="sos"), x)


def record(dry):
    dull = shape(dry, tone(DULL_TOP))
    dip = dull - shape(dull, tone([(20, 0), (20000, 0)], [(7900, 120, -30)]))
    depth = np.clip(1.02 + .25 * walk(12), 0, 1) * (TIME < MOVE_S)
    return band_limit(dull - depth * dip)


dry = scene()
out = record(dry)
materialize(out)
```